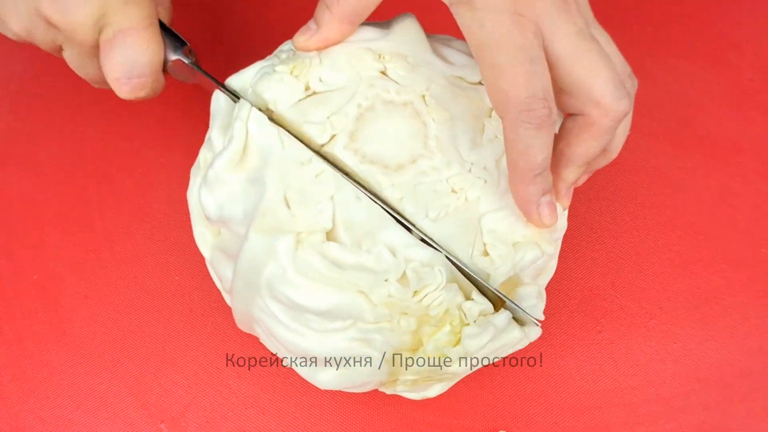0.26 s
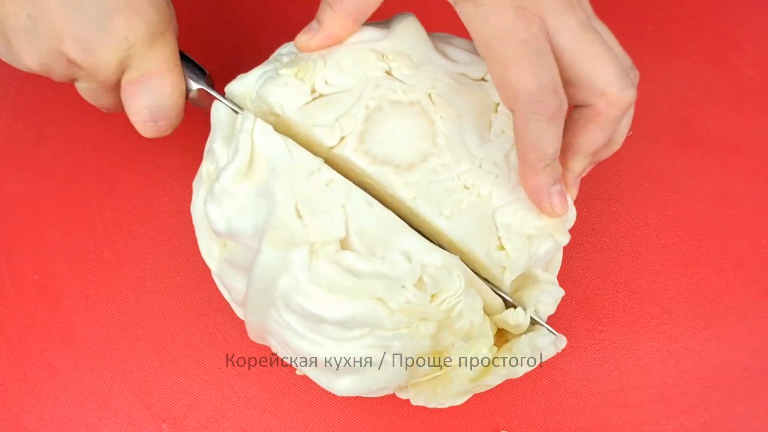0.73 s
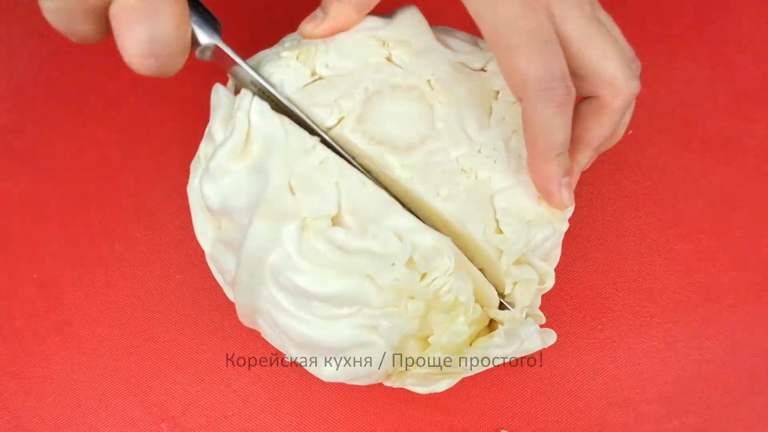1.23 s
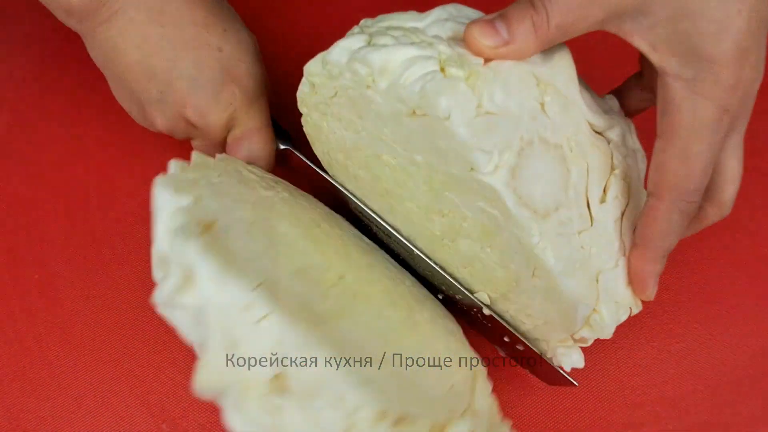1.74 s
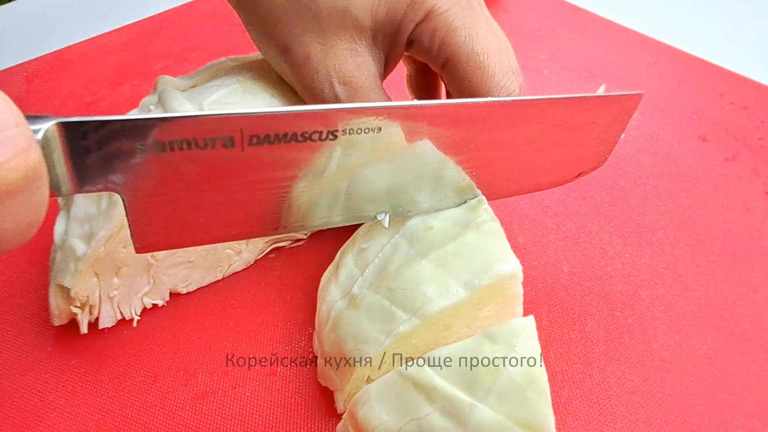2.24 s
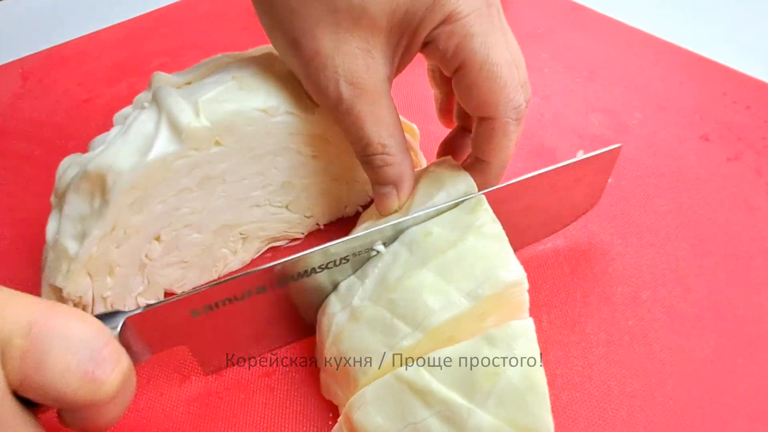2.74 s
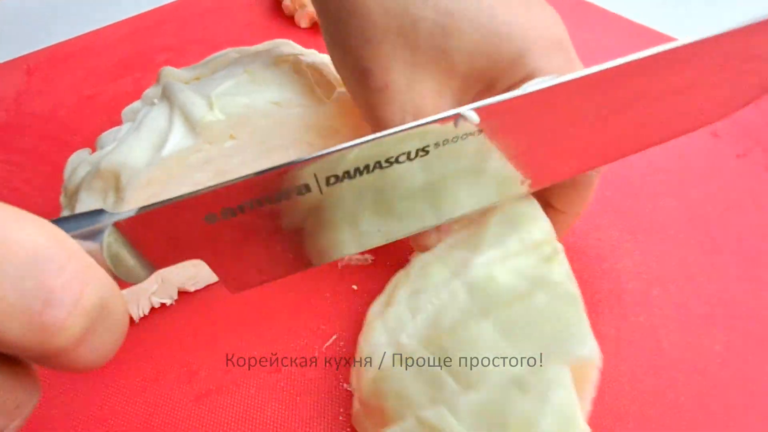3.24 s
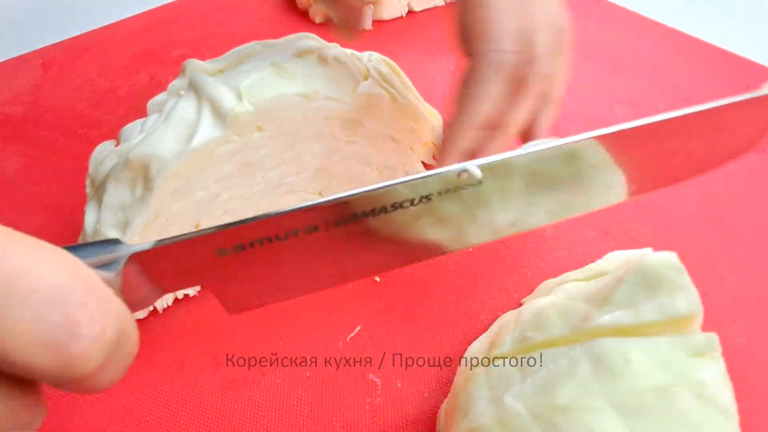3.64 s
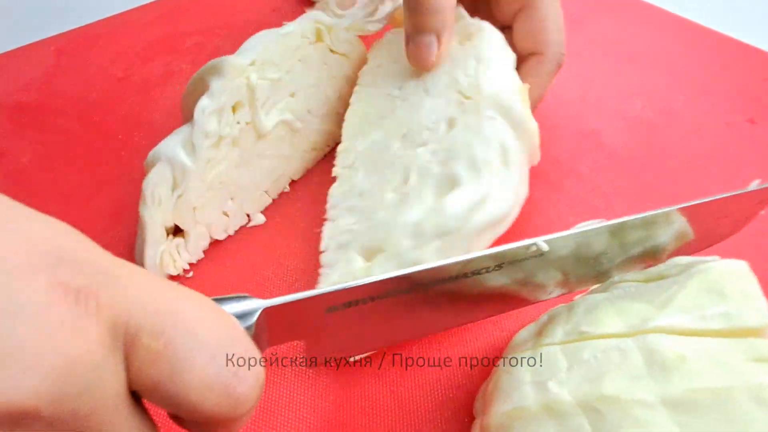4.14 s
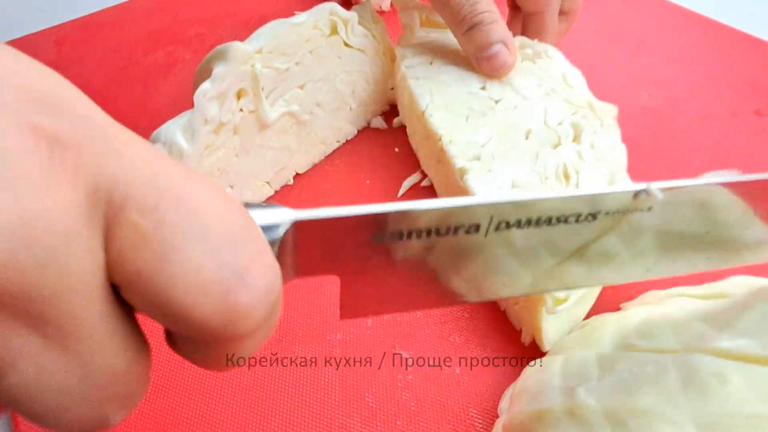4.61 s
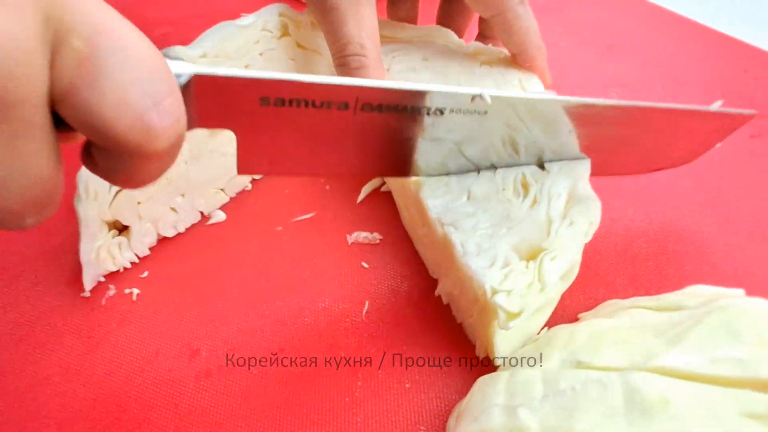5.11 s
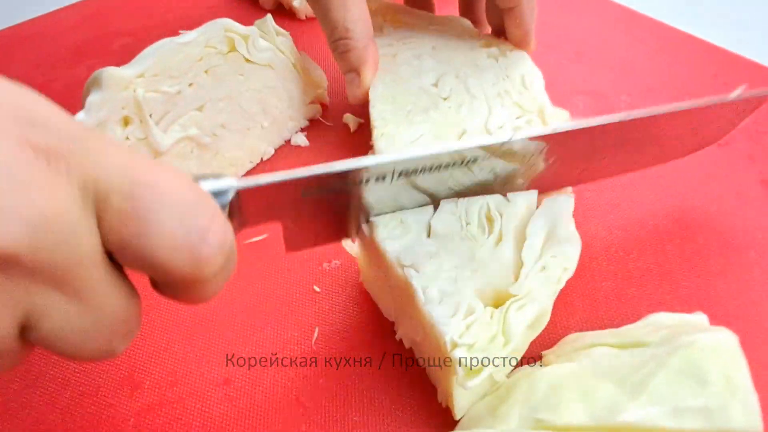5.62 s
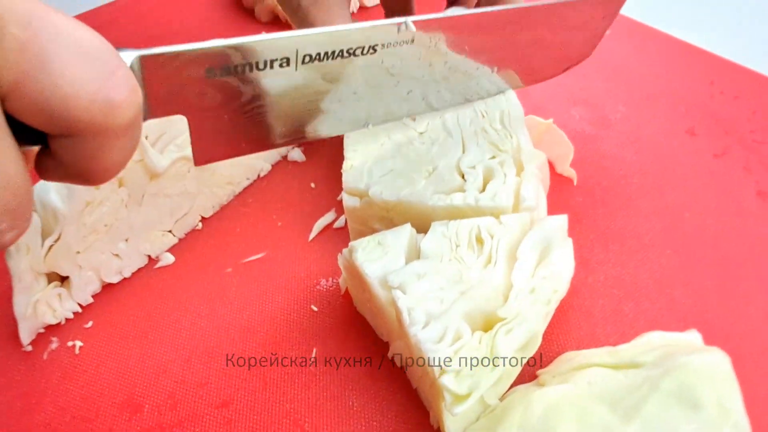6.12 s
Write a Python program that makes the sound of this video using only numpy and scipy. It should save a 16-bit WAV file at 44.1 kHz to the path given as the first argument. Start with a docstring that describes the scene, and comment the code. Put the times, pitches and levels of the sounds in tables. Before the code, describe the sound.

Close up in a kitchen, a knife saws through a firm raw cabbage with crackling, clumpy tearing and sharp leaf snaps over low table thumps. A strong knock rings the board, a brief near-silence follows, then another cut and knock. Soft rustling and faint blade ticks fill the middle before harder crunches and knocks return. Wide stereo, faint short echoes, very quiet room noise.

```python
"""A knife works through a raw cabbage on a board on a light kitchen table, close up and in stereo.
From the start leaves tear in clumps of tiny clicks, with louder snaps as short noise bursts, while
pushes of the hand sway the table in three wavering low tones. At 1.7 s the first strong knock sets
the board ringing; near 2.2 s all but the hum nearly vanishes briefly. A softer middle has two faint
blade rings, then harder cuts and knocks return after 5 s. Faint echoes and a noise hum lie below."""
import sys
import numpy as np
from scipy import signal
from scipy.io import wavfile

SR = 44100
rng = np.random.default_rng(int(sys.argv[2]) if len(sys.argv) > 2 else 0)


def output_pcm(signal):
    """Save a mono or channel-first signal as 16-bit PCM at the path in sys.argv[1].

    Samples are clipped to [-1, 1] before scaling.
    """
    pcm = np.clip(np.atleast_2d(signal).T, -1, 1) * 32767
    wavfile.write(sys.argv[1], SR, np.round(pcm).astype(np.int16))


def field_ratio(decibels):
    """Amplitude ratio for a level in dB (20 dB per decade); scalars and array-likes work."""
    return 10 ** (np.asarray(decibels, dtype=float) / 20)


N = 280917  # length in samples

# Strokes of the blade and handling of the leaves. Each row: full at this time in seconds, tearing
# level in dB, rise in ms, hold in ms, fall in ms; rise and fall each span 20 dB.
STROKES = [(0.004, -36, 5, 2.82, 84), (0.145, -33.5, 18, 65, 71), (0.311, -33.5, 27, 58, 112),
           (0.469, -37, 30, 22, 60), (0.505, -30, 27, 32, 121), (0.672, -30.5, 9, 77, 82),
           (0.861, -37.5, 9, 30, 65), (0.901, -31.5, 82, 16, 81), (1.1, -27.5, 57, 3.4, 112),
           (1.24, -49.5, 160, 150, 77), (1.481, -34, 49, 3, 26), (1.594, -40, 200, 30, 100),
           (1.688, -18.5, 104, 3, 19), (1.708, -35.5, 26, 3, 130), (1.978, -47, 156, 3, 55),
           (2.001, -51.5, 35, 150, 6), (2.298, -54, 21, 120, 220), (2.423, -38, 170, 2.3, 47),
           (2.481, -54.5, 33, 50, 45), (2.579, -23.5, 31, 3.4, 16), (2.611, -40.5, 30, 110, 56),
           (2.739, -37, 44, 23, 48), (2.952, -56, 290, 2.74, 108), (3.011, -60.5, 11, 3.1, 62),
           (3.113, -66.5, 70, 2.6, 42), (3.165, -52, 21, 220, 130), (3.382, -49.5, 64, 69, 21),
           (3.47, -68.5, 30, 40, 130), (3.789, -56.5, 5.06, 86, 140), (3.93, -50, 63, 140, 78),
           (4.146, -40, 45, 47, 140), (4.324, -42.5, 39.5, 3, 100), (4.405, -39.5, 11, 2.8, 68),
           (4.499, -50.5, 100, 43, 130), (4.619, -35.5, 280, 2.85, 57), (4.814, -54.5, 146, 3, 104),
           (4.936, -45, 3, 4.7, 29), (5.12, -37, 70, 61, 110), (5.192, -24.5, 104.4, 3, 90),
           (5.24, -35, 50, 69, 53), (5.416, -26, 110, 3, 24), (5.45, -42.5, 22, 172.5, 29),
           (5.681, -53, 100, 174, 57), (6.016, -60, 7.4, 3.6, 97), (6.169, -60, 7.2, 40, 54),
           (6.217, -34.5, 8, 20, 53), (6.29, -29, 57, 60, 43)]
# Single leaves snapping. Each row: start in seconds, level in dB, treble in dB and low body in dB
# (both relative to that level), length in ms.
LEAF_SNAPS = [(0.0042, -29.5, 0.5, -21, 5.2), (0.0222, -32.5, 0.5, -16, 5.5), (0.1255, -33, -3, -8, 1.2),
              (0.1446, -33.5, -13.5, 6, 2.6), (0.2205, -27.5, -3, 5, 3), (0.3118, -24.5, -1.5, 2, 4.9),
              (0.3294, -23, 6.5, -2.5, 5.6), (0.3577, -19, 4, -7, 4.2), (0.3856, -27.5, -6, 3.5, 4.9),
              (0.501, -26.5, -10.5, 11.5, 1.3), (0.527, -31, -10, 7, 2.5), (0.6637, -37, -10, -3, 1.6),
              (0.6822, -31, -3, -19, 21), (0.7081, -23, -8, -23, 2.7), (0.7222, -19, 2, -5, 3.3),
              (0.7353, -18.5, 1.5, -21, 4.9), (0.7579, -18, -2.5, -4.5, 2.9), (0.8602, -24, -6.5, 0, 2),
              (0.889, -36.5, -2, 5.5, 18), (0.969, -37, -6, -2.5, 15), (1.0868, -25, -1, -25, 37),
              (1.0935, -20, -2, -4, 2.5), (1.3291, -34, 1, -8, 4.5), (1.4742, -31.5, -10, -2.5, 6.2),
              (1.5508, -33.5, 1, 0, 3.9), (1.5924, -39, -0.5, 12.5, 6.8), (1.6835, -23, 2.5, -10, 18.5),
              (1.7969, -38, -1, -10, 4.7), (1.9186, -38, -8.5, 1.5, 1.8), (1.969, -36.5, -4, -1, 8.7),
              (2.112, -37, -1, -17, 2), (2.1532, -44, 2.5, -9.5, 17), (2.301, -36.5, 4, -20, 7.8),
              (2.3344, -39, 2, 1, 5.2), (2.371, -26.5, 1, -21, 3), (2.3761, -22, 0.5, -2.5, 0.87),
              (2.4014, -31.5, 1, -3.5, 13), (2.4226, -31, 3, -18, 16), (2.567, -26, 1, -11, 14),
              (2.5911, -25, -10, 25.5, 0.53), (2.6748, -32.5, 4, -9, 3), (2.7587, -31, -2, -2, 1),
              (2.8785, -50, 4.5, -23.5, 2.4), (2.9288, -43, 3, -17, 1.6), (3.0094, -44.5, -3, -17, 3.9),
              (3.1134, -48, -3, -30, .7), (3.5028, -60, 8, -13.5, 5.6), (3.545, -57.5, 3.5, -19, 2.53),
              (3.8485, -45.5, -12.5, -14, 8.2), (3.9168, -42, -6, -7, 4.3), (4.0039, -36, 9.5, -29, 1.7),
              (4.1845, -32.5, -7.5, -6.5, 5), (4.2327, -38, -4, -19, 13), (4.402, -40, 3, -8, 6),
              (4.4736, -32.5, -5, 7.5, 2.5), (4.6184, -37.5, -12, -5, 1.1), (4.68, -43.5, 1.5, -21, 1.7),
              (4.737, -51.5, 0, -22, 1.9), (4.7919, -43, -9, -5.5, 5.4), (4.936, -40.5, -4.5, -12, 6.8),
              (5.059, -43.5, 11.5, -4, 5.2), (5.0872, -38, 7.5, -2.5, 4.8), (5.1519, -18, 0.5, -8, 0.82),
              (5.3153, -31, -4.5, 1, 2.9), (5.3939, -21, -6.5, -10, 1.8), (5.4187, -16, -12, 6.5, 3.3),
              (5.4933, -34, 4, -9, 4.2), (5.5728, -30.5, 0, -21, 3.2), (5.6067, -32.5, 6, -26, .7),
              (5.71, -43, -1, -23, 2.5), (5.8458, -42.5, -9.5, -21.5, 10.6),
              (6.0176, -50.5, 8.5, -14.5, 7.3), (6.076, -59.5, -3.5, -19.5, 1.52),
              (6.2211, -25, 0, -10, 2.1), (6.2778, -41, -1, -4, 15), (6.3448, -31, -1, 8, 6.2)]
# Colour of the tearing. Each row: time in seconds, treble in dB and low body in dB, both relative
# to the tearing level; the body also follows the strength of the strokes.
TEARING_COLOUR = [(0.0, -1.5, -3.5), (0.6, -3.5, -2), (1.05, -6.5, -9), (1.2, 0.5, -1), (1.42, -1.5, -2.5),
                  (1.66, -2, -1.5), (1.75, -3, -8), (1.95, 1.5, -4), (2.3, 4, -6.5), (2.56, 3, -10),
                  (2.62, -4, 9), (2.78, 0.5, -7), (3.1, -0.5, -7), (3.35, 1, -1), (3.8, -0.5, -2),
                  (4.3, -2, -10), (4.5, 3, -12), (4.8, -4, -7.5), (5.1, 5, -10), (5.4, 0.5, -10.5),
                  (5.46, 1, 8), (5.62, 0, -12), (5.9, 2.5, -11), (6.3, 0, -14.5)]
# Tone colour of the leaves. Each row: frequency in Hz, relative level in dB per Hz.
LEAF_SPECTRUM = [(150, -27.5), (250, -17), (319, -3.5), (528, -3.5), (597, 2), (845, 3.5), (1040, 0.5),
                 (1310, 2.5), (2240, -5), (3230, -2), (4900, -8), (6470, -6.5), (7980, -15), (12100, -12.5),
                 (16000, -22)]
# Likeness of the two ears. Each row: frequency in Hz, left-right likeness (1 = the same).
EAR_LIKENESS = [(60, 0.92), (125, 0.62), (250, .87), (500, 0.21), (1000, 0.027), (2000, 0.026),
                (16000, 0.05)]
# Balance of the two ears. Each row: frequency in Hz, left minus right in dB.
EAR_LEAN = [(60, -3), (240, 2.5), (950, 0.5), (3770, 2), (15000, -1)]
# Pushes of the hand on the table. Each row: full at this time in seconds, main mode in dB, low mode
# in dB, upper mode in dB, time to fall 20 dB in ms; levels are before flutter.
HAND_PUSHES = [(0.0, -34, -30, -37, 67), (0.19, -23, -26, -31.5, 110), (0.316, -29.5, -21, -30.5, 56),
               (0.37, -24, -31, -31.5, 70), (0.482, -31, -25, -48, 50), (0.53, -29.5, -31, -35.5, 108),
               (0.691, -15, -22.5, -28.5, 40), (0.754, -40, -20.5, -30.5, 74), (0.79, -28.5, -39, -44, 70),
               (0.872, -25.5, -40, -48, 40), (0.914, -21.5, -26, -58, 53), (1.104, -37.5, -35.5, -40, 160),
               (1.382, -49.5, -61, -65, 98), (1.48, -52, -55, -53, 200), (1.612, -31, -21.5, -45, 78),
               (1.665, -24, -28, -43, 70), (1.712, -25, -40, -18.5, 73), (1.745, -32, -35.5, -24, 50),
               (1.787, -17.5, -25, -41, 50), (1.9, -30, -29, -54, 60), (1.938, -27, -26, -55, 70),
               (1.976, -25, -26, -45, 94), (2.161, -66, -42.5, -48.5, 97), (2.312, -39.5, -32, -37, 189),
               (2.434, -24, -22, -28, 67), (2.591, -28, -37, -23.5, 87), (2.794, -34, -32, -35.5, 49),
               (2.942, -52.5, -62.5, -54, 48), (3.182, -47, -50, -48.5, 66), (3.33, -61, -57, -54, 92),
               (3.42, -51, -70, -55.5, 69.5), (3.552, -46, -51, -70.5, 56), (3.803, -42.5, -45, -56, 42.5),
               (3.88, -56, -45, -57, 80), (3.955, -44, -39, -50, 95), (4.064, -29.5, -28, -35, 80),
               (4.14, -48, -45, -37, 108), (4.25, -49.5, -54, -50.5, 164), (4.48, -43.5, -45, -44, 112),
               (4.574, -34.5, -42, -32.5, 97), (4.64, -46, -40.5, -44, 70), (4.826, -53.5, -50, -66, 100.5),
               (4.952, -52, -36.5, -45.5, 111.5), (5.129, -31, -22, -28.5, 105),
               (5.175, -24, -22.5, -29, 82), (5.23, -23.5, -37, -30, 78.5), (5.29, -32, -44, -28.5, 200),
               (5.368, -27.5, -49, -30.5, 200), (5.438, -40, -33, -25.5, 90), (5.598, -39.5, -47, -48, 100),
               (5.86, -50, -49, -56, 100), (6.024, -50.5, -47.5, -60, 105), (6.227, -39, -37.5, -31, 41.5),
               (6.27, -35, -30, -34.5, 116), (6.32, -27, -27, -29, 101), (6.36, -28, -29, -30, 100)]
# Modes of the table top: main, low, upper. Each row: pitch in Hz, spread of its wobble in Hz,
# speed of the wobble in Hz, spread of the flutter in dB.
TABLE_MODES = [(91.2, 9.4, 5.5, 5.5), (54.24, 11, 9.1, 2), (160.6, 32, 37, 3.5)]
# Blade and cabbage halves knocking on the board. Each row: time in seconds, strength in dB before
# the trims of board and rattle, hardness in dB per octave.
BOARD_KNOCKS = [(1.6960, -5, 0), (2.589, -7, -1), (4.474, -44.5, 8), (5.2225, -12, -4), (5.426, -5.5, 1),
                (6.3484, -10.5, -2.5)]
# Ringing modes of the board. Each row: pitch in Hz, relative level in dB, time to fall 60 dB in seconds.
BOARD_MODES = [(137, 0, 0.2), (201.4, -6, 0.3), (255, -6, 0.34), (322, 5.5, 0.052), (398, -12.5, 0.34),
               (470, 2.5, 0.043), (493, -5, 0.11), (588, 9, 0.054), (659.7, -10.5, 0.12), (746, -4, 0.12),
               (860, -18.5, 0.34), (880, 6, 0.017), (1020, -23, 0.17), (1174, -17, 0.18),
               (1440, -26.5, 0.038)]
# Touches on the blade. Each row: time in seconds, strength in dB, hardness in dB per octave.
BLADE_TICKS = [(4.474, -55, 0), (4.936, -50, 0)]
# Ringing modes of the blade. Each row: pitch in Hz, relative level in dB, time to fall 60 dB in seconds.
BLADE_MODES = [(6600, -6, .14), (6680, -2, .2), (6770, -5, .15), (6880, -8, .1)]
# Stretches where all but the hum is nearly silent. Each row: from seconds, to seconds.
PAUSES = [(2.172, 2.272)]
# Tone colour of the room noise. Each row: frequency in Hz, relative level in dB per Hz.
HUM_SPECTRUM = [(18, -40), (30, -9), (81, 12), (204, 4), (336, -4), (449, -21), (600, -20), (962, -29),
                (1720, -42.5), (1860, -34.5), (5170, -35.5), (6720, -33), (7470, -33.5), (12000, -34),
                (16000, -42)]
# Steady bands in the hum. Each row: centre in Hz, width in Hz, level in dB rms.
HUM_BANDS = [(66.5, 9.3, -69), (189.4, 14, -71)]


def cabbage(cells_per_s, size_db, clump_db, tail_t60_s):
    """Cells burst as dense clicks that come in clumps; leaves snap as short bursts with a faint tail."""
    tearing_power = sum(field_ratio(db + swell_db(s, *ms)) ** 2 for s, db, *ms in STROKES)
    tearing_db = 10 * np.log10(tearing_power)
    colour_s, *colour_db = np.transpose(TEARING_COLOUR)
    bright_db, body_db = [np.interp(np.arange(N) / SR, colour_s, db) for db in colour_db]
    # a harder stroke reaches thicker ribs: 0.24 dB more body per dB
    body_db = body_db + 0.24 * (np.maximum(tearing_db, -70) + 40)

    bursting = rng.random(N) < cells_per_s / SR
    cells = bursting * field_ratio(size_db * np.minimum(rng.exponential(1, N), 4))
    grain = rms_one(cells + 1.14)  # clicks over a steady base
    clumps = rms_one(field_ratio(clump_db * drift(33) + 0.5 * drift(210)))
    parts_db = tearing_db + np.array([body_db, 0 * body_db, bright_db])
    power = (clumps * field_ratio(parts_db)) ** 2

    # 220 lesser snaps fall at random, around 0.5 dB under the tearing and 1.57 ms long
    at = rng.integers(0, N, 220)
    luck_db = rng.normal(0, 1, (220, 4)) * 5.5
    small = zip(at / SR, tearing_db[at] - 0.5 + luck_db[:, 0], bright_db[at] + luck_db[:, 1],
                body_db[at] + luck_db[:, 2], 1.57 * field_ratio(luck_db[:, 3]))
    age = np.arange(3000) / SR
    for s, db, shine_db, thick_db, ms in [*LEAF_SNAPS, *small]:
        i = round(s * SR)
        snap = field_ratio(-7.0 * (1000 * age / max(ms, 0.6)) ** 2)
        tail = field_ratio(-22.5 - 60 * age / tail_t60_s)
        peak = field_ratio(db + np.array([[thick_db], [0], [shine_db]]))
        power[:, i:i + len(age)] += (peak * (snap + tail)[:N - i]) ** 2
    ribs, leaves, thin_edges = np.sqrt(power)

    def level_at(hz):
        """Loudness in time of one band."""
        share = np.clip(np.log2(hz / 900), 0, 1)  # ribs hand over to leaves across an octave
        level = thin_edges if hz > 7500 else ribs ** (1 - share) * leaves ** share
        return level * field_ratio(2.1 * drift(22.0))  # every leaf has a colour of its own

    return coloured(grain, LEAF_SPECTRUM, level_at)


def table(side_db):
    """Each mode of the top swings near its own pitch, pushed off it by the uneven hand."""
    out = 0
    # a push builds in 0.46 of its fall time
    power = sum(field_ratio(np.c_[dbs] + swell_db(s, 0.46 * ms, 0, ms)) ** 2 for s, *dbs, ms in HAND_PUSHES)
    for size, (hz, wobble_hz, rate, flutter_db) in zip(np.sqrt(power), TABLE_MODES):
        mid, side = [np.sin(2 * np.pi * np.cumsum(hz + wobble_hz * drift(rate)) / SR) for _ in range(2)]
        level = size * field_ratio(flutter_db * drift(3.1 * rate))
        out = out + level * (mid + field_ratio(side_db) * side * [[1], [-1]])
    return out


def struck(hits, modes, spread_db, offset_db, contact_s):
    """Each hit strikes every mode with a strength of its own, the modes starting within a moment."""
    s, hit_db, hardness_db = np.transpose(hits)
    out = np.zeros(N)
    own = rng.normal(0, 1, (len(hits), len(modes)))
    middle_hz = modes[len(modes) // 2][0]
    for k, (hz, level_db, t60) in enumerate(modes):
        clicks = np.zeros(N)
        tilt_db = hardness_db * np.log2(hz / middle_hz)  # a harder hit favours the higher modes
        strength_db = hit_db + level_db + offset_db + tilt_db + spread_db * own[:, k]
        clicks[(s * SR).astype(int)] = -field_ratio(strength_db)
        delay = round(contact_s * SR * (k * 0.537 % 1))
        out += np.roll(ring(clicks, hz, t60), delay)
    return out


def rattle(level_db, t60, low_hz, high_hz):
    """After a knock board and table jar against each other: dull, dense noise that dies away."""
    hits = np.zeros(N)
    hits[[round(s * SR) for s, _, _ in BOARD_KNOCKS]] = [field_ratio(db + level_db) for _, db, _ in BOARD_KNOCKS]
    dying = signal.lfilter([1], [1, -field_ratio(-60 / (t60 * SR))], hits + 1e-18)
    dying = dying * field_ratio(3.5 * drift(45.0))  # unevenly
    band = signal.butter(3, [low_hz, high_hz], "band", fs=SR, output="sos")
    mid, side = signal.sosfilt(band, dying * rng.standard_normal((2, N)))
    return mid + 0.45 * side * [[1], [-1]]


def kitchen(x, t60_s, wall_cut_hz):
    """Echoes off the walls: eight feedback delays a side, duller on every round."""
    out = np.zeros((2, N))
    dull = np.exp(-2 * np.pi * wall_cut_hz / SR)
    for k, lag in enumerate((np.geomspace(0.009, 0.033, 16) * SR).astype(int)):
        loop, state = x.copy(), [0.]
        gain = field_ratio(-60 * lag / SR / t60_s)
        for i in range(lag, N, lag):  # one delay length at a time
            back, state = signal.lfilter([gain * (1 - dull)], [1, -dull], loop[i - lag:i], zi=state)
            loop[i:i + lag] += back[:N - i]
        out[k % 2] += (loop - x) * (-1) ** (k // 2)
    return out


def hum():
    """Broad room noise with two narrow steady bands in the bass, made by noise through resonators."""
    out = field_ratio(-90.5) * coloured(0.81, HUM_SPECTRUM, lambda hz: 1)
    for hz, width_hz, level_db in HUM_BANDS:
        band = ring(rng.standard_normal(N), hz, 2.2 / width_hz)
        out = out + field_ratio(level_db) * rms_one(band)
    return out


def coloured(grain, spectrum, level_at):
    """Third-octave noise bands; both ears hear the same grains, with signs alike only in the bass."""
    out = 0
    edges = 36 * 2 ** (np.arange(27) / 3)
    white = grain * rng.standard_normal((2, 2, N))  # neighbouring bands take turns
    gains = field_ratio(at_hz(spectrum, edges * 1.12))
    for k, low in enumerate(edges):
        if gains[k] < 1e-3:  # too faint to matter
            continue
        sos = signal.butter(2, [low, min(low * 1.26, 17000)], "band", fs=SR, output="sos")
        mid, side = signal.sosfilt(sos, white[k % 2] * level_at(low))
        alike = np.clip(at_hz(EAR_LIKENESS, low), -1, 1)
        lean = field_ratio(at_hz(EAR_LEAN, low) / 2 * np.array([[1], [-1]]))
        ears = np.sqrt(1 + alike) * mid + np.sqrt(1 - alike) * side * [[1], [-1]]
        out = out + gains[k] * lean * ears
    # the bands from 1400 to 7000 Hz set the overall level
    ref = (edges > 1400) & (edges < 7000)
    return out / np.sqrt(np.sum(gains[ref] ** 2 * edges[ref] * 0.26) * 4 / SR)


def ring(clicks, hz, t60):
    """A two-pole resonator: a unit click sets a dying sine ringing from height 1."""
    r, w = field_ratio(-60 / (t60 * SR)), 2 * np.pi * hz / SR
    return signal.lfilter([0, np.sin(w)], [1, -2 * r * np.cos(w), r * r], clicks + 1e-18)


def swell_db(s, rise_ms, hold_ms, fall_ms):
    """Envelope in dB: up 20 dB in the rise time, level, then down 20 dB in each fall time."""
    ms = 1000 * (np.arange(N) / SR - s)
    rise, fall = ms / max(rise_ms, 1), (hold_ms - ms) / max(fall_ms, 1)
    return np.maximum(20 * np.minimum(0, np.minimum(rise, fall)), -200)


def drift(rate):
    """Slow chance of spread 1: noise at every 8th sample twice through a one-pole low-pass at rate Hz."""
    r = np.exp(-16 * np.pi * rate / SR)
    noise = rng.standard_normal(N // 8 + 6002)
    slow = signal.lfilter([1], [1, -2 * r, r * r], noise)[6000:]  # skip the start-up
    return np.interp(np.arange(N) / 8, np.arange(len(slow)), rms_one(slow))


def at_hz(points, hz):
    """Reads a table at a frequency, in straight lines over log frequency."""
    table_hz, values = np.transpose(points)
    return np.interp(np.log(hz), np.log(table_hz), values)


def rms_one(x):
    """Scales a signal to an rms of 1."""
    return x / np.sqrt(np.mean(x ** 2) + 1e-20)


def scene():
    """Adds up the cutting sounds and their echoes, dips them in the pauses, and lays the hum below."""
    leaves = cabbage(cells_per_s=4000.0, size_db=3.5, clump_db=2.0, tail_t60_s=0.17)
    board = struck(BOARD_KNOCKS, BOARD_MODES, spread_db=2.5, offset_db=-14.0, contact_s=0.0007)
    blade = struck(BLADE_TICKS, BLADE_MODES, spread_db=1, offset_db=0, contact_s=0.0003)
    jarring = rattle(level_db=-4.0, t60=0.34, low_hz=228.0, high_hz=940.0)
    echoes = kitchen(field_ratio(-19.5) * board + field_ratio(-23.0) * leaves[0], t60_s=0.34, wall_cut_hz=1900)
    room = signal.sosfilt(signal.butter(1, 180.0, "high", fs=SR, output="sos"), echoes)
    blade_ears = blade * field_ratio([[2.5], [-2.5]])  # louder on the left
    near = leaves + board + jarring + blade_ears + table(side_db=-18.5) + room
    for start, end in PAUSES:
        # gain 0.9 up to the pause, about a hundredth inside it, 1 after it
        corners_s = [start - 0.004, start, end, end + 0.013]
        near = near * np.interp(np.arange(N) / SR, corners_s, [0.9, 0.01, 0.012, 1])
    return near + hum()


def top_cut(x):
    """Nothing passes above the cut-off."""
    return signal.sosfilt(signal.butter(12, 16410, fs=SR, output="sos"), x)


def record(dry):
    """The microphone rolls off the deep bass; the loudest peaks are rounded."""
    heard = signal.sosfilt(signal.butter(3, 42.0, "high", fs=SR, output="sos"), dry)
    mix = 1.577 * np.tanh(heard / 1.423)
    return top_cut(mix)


dry = scene()
out = record(dry)
output_pcm(out)
```